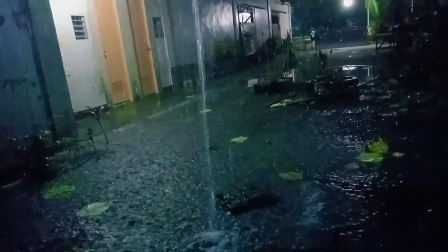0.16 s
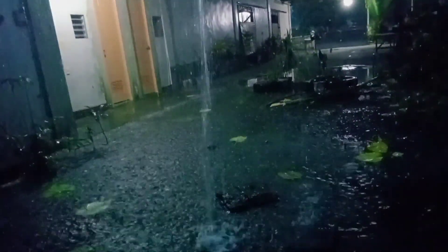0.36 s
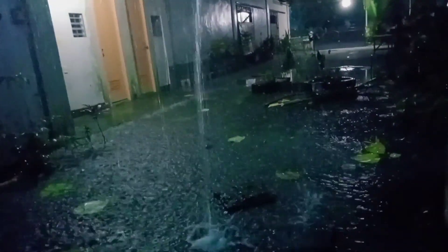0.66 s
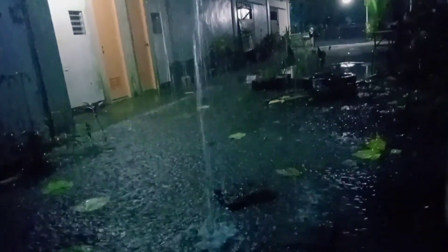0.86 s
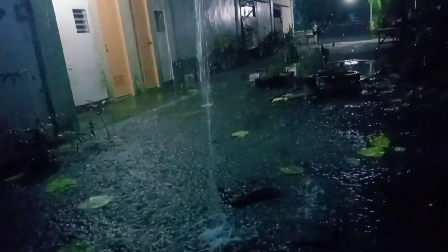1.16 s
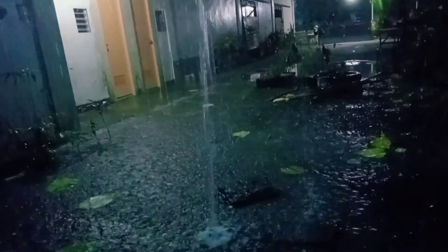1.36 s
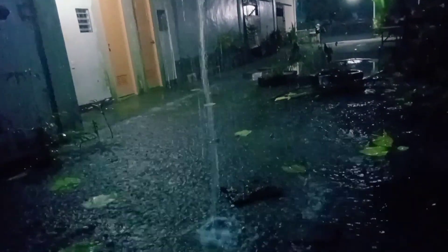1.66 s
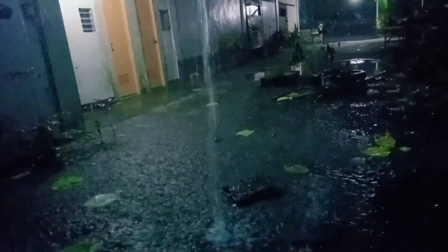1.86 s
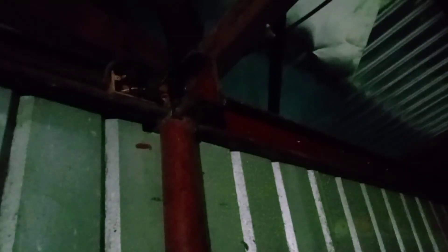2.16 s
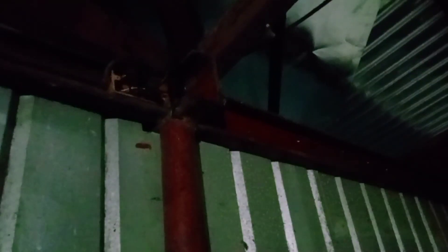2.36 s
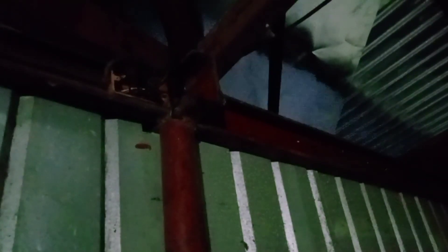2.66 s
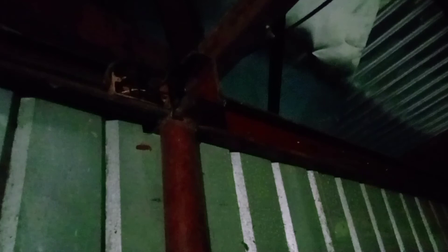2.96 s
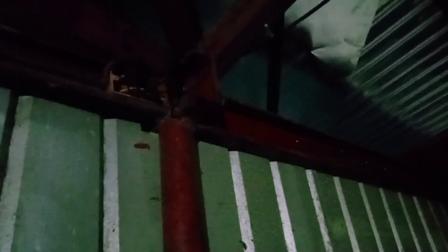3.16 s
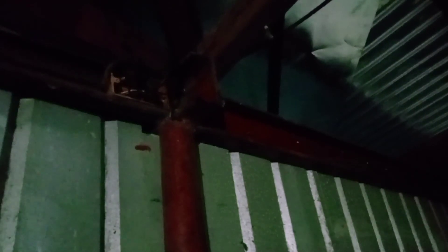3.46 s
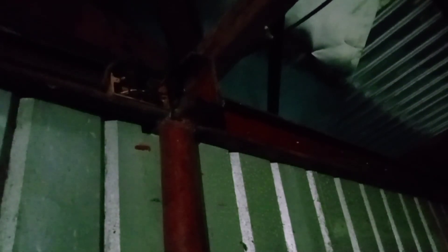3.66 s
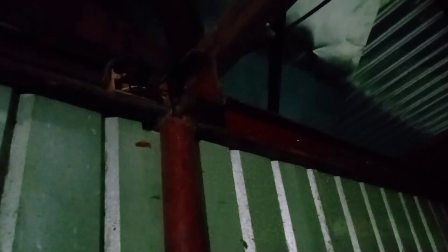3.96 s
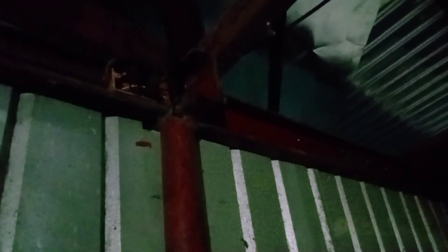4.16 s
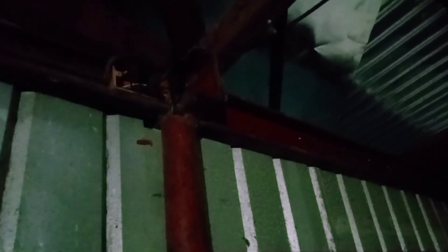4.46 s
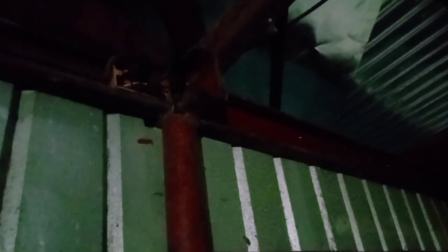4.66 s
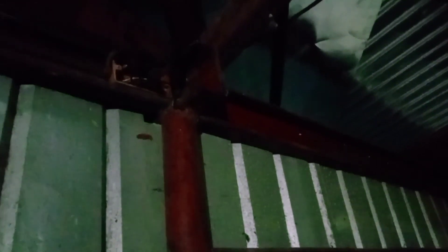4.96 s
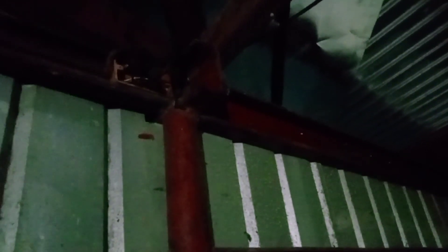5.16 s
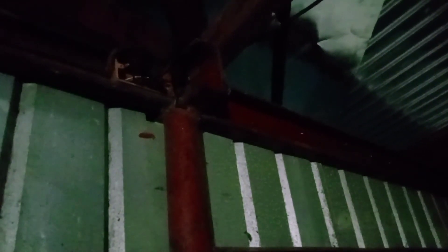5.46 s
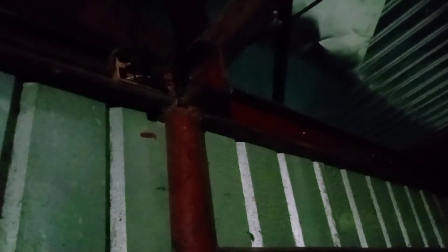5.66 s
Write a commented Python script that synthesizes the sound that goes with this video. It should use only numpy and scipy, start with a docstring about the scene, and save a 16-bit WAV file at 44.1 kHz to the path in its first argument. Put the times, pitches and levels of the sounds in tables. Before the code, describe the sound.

From 0 to about 1.87 seconds, a stream of water falling from eaves breaks on a flooded yard at night: dense sharp slaps, small ringing bubbles, thin fizzing spray and a broad wash of rain, with slight gushes near 0.1, 0.7, 1.25 and 1.6 seconds and a low rumble beneath. A low boom swells just before the sound is cut off. Near-silence lasts until roughly 2.1 seconds, then rain on a corrugated metal roof rises to full within about 0.15 seconds. It is dense and continuous, mixing bright patter with hollow midrange drumming, which bulges around 2.55 seconds. Soft bass booms come at about 2.3 and 3.2 seconds, the latter longest and strongest, with weaker ones at 2.7, 3.6, 3.9 and 4.3. From about 3.3 to 5 seconds the rain eases slightly and its rumble recedes, then holds steady to the end, with one very faint boom near 5.7.

```python
"""A stream off the eaves splashes in a flooded yard; then dense rain drums on a corrugated metal roof.
The stream is random slaps, ringing bubbles and fine spray over a noise wash, gushing now and then.
A near-silence parts the two places. The roof layers bright patter, hollow drumming and a low rumble
from random drops and resonances. Single low modes boom out, and a faint deep rumble lies under both."""
import sys
import numpy as np
from scipy import signal
from scipy.fft import rfft, irfft
from scipy.io import wavfile
from scipy.ndimage import uniform_filter1d

SR = 44100
rng = np.random.default_rng(int(sys.argv[2]) if len(sys.argv) > 2 else 0)


def master(y):
    """Save y as 16-bit WAV."""
    cut = np.clip(np.atleast_2d(y).T, -1, 1)
    pcm = np.round(cut * 32767)  # scale
    wavfile.write(sys.argv[1], SR, pcm.astype(np.int16))


N = 256662

# Tone of the splashing water: pitch_hz [Hz], level_db [dB per Hz, relative]
SPLASH_TONE = [(130, -23.5), (190, -8.5), (230, -2), (280, -7), (450, -5.5), (750, -2.5), (1100, -0.8),
               (1550, 1), (2200, -.5), (2800, -3), (3500, -10), (4300, -17.5), (5500, -23.5), (8000, -44)]


def stream_splash(clumps, wash):
    """Water breaks on water: sharp slaps, ringing bubbles and the wash of far rain; power near 1."""
    slaps = impacts(2800 * clumps, spread_db=1.5, ring_t60=0.025, ring_db=4)
    bubbles = rings(1100 * clumps, spread_db=1.0, cycles=55, low_hz=305.4, high_hz=4970)
    mix = slaps + from_db(-5.5) * bubbles + from_db(2.5) * wash
    water = patchy(mix, depth_db=1.9, rate_hz=8)
    return evened(coloured(water, SPLASH_TONE), span_s=0.089)


# Tone of the lower, fizzing part of the spray: pitch_hz [Hz], level_db [dB per Hz, relative]
FIZZ_TONE = [(4000, -6.5), (5400, -5.5), (6200, 0), (7000, 0), (7450, -8.5), (8400, -16.5), (10000, -30.5)]
# Tone of the finest, highest spray: pitch_hz [Hz], level_db [dB per Hz, relative]
SPRAY_TONE = [(8000, -15), (9200, -7), (9800, -8), (10900, -4.5), (11600, 0.5), (13400, -0.5),
              (14300, -8.5), (15500, -8.5)]
FIZZ_DB, SPRAY_DB = -35, -44.5
FIZZ_FOLLOWS = 0.5   # share of the spray's rise in dB


def thrown_spray(clumps, wash, spray_rise_db):
    """Droplets thrown up by the stream fall back in showers and trap tiny ringing bubbles."""
    droplets = impacts(2400 * clumps, spread_db=3.5, ring_t60=0.035, ring_db=5.5)
    tiny_bubbles = rings(900 * clumps, spread_db=3.0, cycles=290, low_hz=4500, high_hz=13900)
    showers = from_db(0.7 * drift(10)) * (droplets + from_db(-7) * tiny_bubbles)
    mist = showers + from_db(-1.5) * wash
    fizz_gain = from_db(FIZZ_DB + FIZZ_FOLLOWS * spray_rise_db)
    fizz = fizz_gain * evened(coloured(mist, FIZZ_TONE), span_s=0.15)
    spray = from_db(SPRAY_DB + spray_rise_db) * evened(coloured(mist, SPRAY_TONE), span_s=0.15)
    return fizz + spray


# Gushes, mostly louder or richer in spray:
# middle_s [s], length_s [s], splash_rise_db [dB], spray_rise_db [dB]
STREAM_GUSHES = [(0.13, 0.26, 0.6, 2.2), (0.195, 0.07, -0.5, 3), (0.7, 0.22, 1.0, 0.0),
                 (1.25, 0.14, 1.2, 3.2), (1.58, 0.53, 1.0, 0.5)]
# Low modes rumbling in the yard: pitch_hz [Hz], width_hz [Hz], level_db [dB, relative]
YARD_LOW_MODES = [(93, 24, -0.5), (133, 72, -1), (191, 40, -2.5)]
SPLASH_DB, YARD_RUMBLE_DB = -16, -32
STREAM_WAVER_DB = 0.27   # chance wander shared by splash and spray


def yard():
    """The stream arrives in clumps that drive splash and spray together, over a low rumble."""
    splash_rise_db, spray_rise_db = swells(STREAM_GUSHES) + STREAM_WAVER_DB * drift(4)
    clumps = from_db(0.9 * drift(14))
    wash = rng.standard_normal(N)
    splash = from_db(SPLASH_DB + splash_rise_db) * stream_splash(clumps, wash)
    spray = thrown_spray(clumps, wash, spray_rise_db)
    low = from_db(YARD_RUMBLE_DB) * rumble(YARD_LOW_MODES, even_s=0.08)
    return splash + spray + low


# Tone of the bright patter: pitch_hz [Hz], level_db [dB per Hz, relative]
PATTER_TONE = [(600, -9.5), (1150, -1.5), (2200, -1), (3200, -4), (4500, -5.5), (5200, -12.5),
               (6000, -21.5), (6700, -24), (7800, -37), (9600, -41), (10400, -34.5), (11500, -29.5),
               (12600, -38), (15500, -46)]
# Tone of the hollow drumming: pitch_hz [Hz], level_db [dB per Hz, relative]
DRUMMING_TONE = [(120, -25), (190, -6.5), (260, -1.2), (380, -.5), (520, -1.5), (720, 0), (950, -2.5),
                 (1300, -12), (2200, -19)]
# Levels at 0 dB rain; each FOLLOWS is dB gained per dB of rain
PATTER_DB, RAIN_WAVER_DB = -15.5, 0.32
DRUMMING_DB, DRUMMING_FOLLOWS, DRUMMING_WAVER_DB = -18.6, 1.07, 0.96


def struck_sheets(flurries, rain_db):
    """The same drops give the sheets bright patter and hollow drumming; far sheets blur to a wash."""
    patter_db = PATTER_DB + rain_db + RAIN_WAVER_DB * drift(4)
    drumming_db = DRUMMING_DB + DRUMMING_FOLLOWS * rain_db + DRUMMING_WAVER_DB * drift(4.9)
    ticks = impacts(3600 * flurries, spread_db=3.0, ring_t60=0.069, ring_db=4.5)
    # fat drops leave a brief note in the sheet they hit
    knocks = rings(700 * flurries, spread_db=2.0, cycles=47, low_hz=201.1, high_hz=3194)
    mix = ticks + from_db(-10.5) * knocks + from_db(-1.5) * rng.standard_normal(N)
    sheets = patchy(mix, depth_db=1.77, rate_hz=8.5)
    patter = from_db(patter_db) * evened(coloured(sheets, PATTER_TONE), span_s=0.1)
    drumming = from_db(drumming_db) * evened(coloured(sheets, DRUMMING_TONE), span_s=0.17)
    # turned a quarter cycle, the drumming adds to the patter by power where their tones overlap
    return patter + signal.hilbert(drumming).imag


# A squall drives the hollow resonance harder for a moment:
# middle_s [s], length_s [s], rise_db [dB]
HOLLOW_SQUALLS = [(2.55, 0.5, 8.5)]
HOLLOW_HZ, HOLLOW_WIDTH_HZ = 736, 280   # width of each of two passes
HOLLOW_DB, HOLLOW_FOLLOWS = -31, 2.2


def hollow_sheets(flurries, rain_db):
    """Drops excite the sheets' hollow middle resonance, two band-passes in a row."""
    level_db = HOLLOW_DB + HOLLOW_FOLLOWS * rain_db + swells(HOLLOW_SQUALLS)[0]
    hollow = impacts(1300 * flurries, spread_db=2.0, ring_t60=0.067, ring_db=6, count=12)
    for _ in range(2):
        hollow = resonance(hollow, HOLLOW_HZ, HOLLOW_WIDTH_HZ)
    return from_db(level_db) * evened(hollow, span_s=0.15)


# Strength of the rain on the roof, peaking and then easing: time_s [s], level_db [dB]
RAIN_STRENGTH = [(2.24, 0), (3.3, 0.03), (4.1, -0.6), (5.0, -1.4), (5.82, -1.5)]
# Low modes of the roof sheets: pitch_hz [Hz], width_hz [Hz], level_db [dB, relative]
ROOF_LOW_MODES = [(83.7, 31, -0.5), (121.7, 21, 2.5), (142, 24, -1.5), (185.5, 52, -1.5)]
# heavy drops shake the low modes most
ROOF_RUMBLE_DB, ROOF_RUMBLE_FOLLOWS = -28, 4.0


def roof():
    """Flurries of drops strike the sheets, ring their hollow middle and shake their low modes."""
    rain_db, = in_time(RAIN_STRENGTH)
    flurries = from_db(0.7 * drift(10))
    rumble_db = ROOF_RUMBLE_DB + ROOF_RUMBLE_FOLLOWS * rain_db
    low = from_db(rumble_db) * rumble(ROOF_LOW_MODES, even_s=0.079)
    return struck_sheets(flurries, rain_db) + hollow_sheets(flurries, rain_db) + low


# Single low modes that boom out of the rumble:
# middle_s [s], length_s [s], pitch_hz [Hz], level_db [dB rms at the crest, before the shudder]
LOW_BOOMS = [(1.819, 0.12, 138, -23), (2.287, 0.12, 123.8, -21.5), (2.69, 0.09, 120, -28),
             (3.225, 0.27, 119, -20), (3.59, .11, 118, -27.5), (3.88, 0.11, 119, -27),
             (4.342, 0.065, 158, -26), (5.72, 0.12, 130.5, -33)]


def booms():
    """Single low modes boom out, each swelling and dying away, unsteady in pitch and strength."""
    t, out = np.arange(N) / SR, np.zeros(N)
    waver_rad, shudder_db = 0.35 * drift(16), 1.1 * drift(20)
    for middle_s, length_s, hz, db in LOW_BOOMS:
        swell = np.cos(np.pi * np.clip((t - middle_s) / length_s, -0.5, 0.5))
        tone = np.sqrt(2) * np.sin(2 * np.pi * hz * t + waver_rad)
        out += from_db(db) * swell * tone
    return out * from_db(shudder_db)


RUMBLE_WAVER_DB = 1.65


def rumble(modes, even_s):
    """Countless drops, as noise, keep low modes going; their strength swells by chance."""
    shaking = sum(from_db(db) * resonance(rng.standard_normal(N), hz, width)
                  for hz, width, db in modes)
    band = signal.butter(2, [64, 220], "band", fs=SR, output="sos")
    low_modes = signal.sosfilt(band, shaking)
    return from_db(RUMBLE_WAVER_DB * drift(4)) * evened(low_modes, even_s)


# Tone of the downpour's deep rumble: pitch_hz [Hz], level_db [dB per Hz, relative]
DEEP_TONE = [(20, -5), (35, -1), (55, 0)]


def deep_rumble():
    """The faint deep rumble of the downpour: steady noise shaped to the lowest bass."""
    return from_db(-56) * coloured(rng.standard_normal(N), DEEP_TONE)


def impacts(per_s, spread_db, ring_t60, ring_db, count=24):
    """Drops land on many patches; each gives a sharp tick and a ring of its own."""
    out = np.zeros(N)
    for _ in range(count):
        clicks = drops(per_s / count, spread_db)
        ringing = signal.oaconvolve(clicks, dying_noise(ring_t60))[:N]
        out += clicks + from_db(ring_db) * ringing
    return rms_one(out)


def rings(per_s, spread_db, cycles, low_hz, high_hz, count=56):
    """Each impact sets one of many pitches ringing, falling 60 dB in a set number of cycles."""
    out = np.zeros(N)
    for hz in np.geomspace(low_hz, high_hz, count):
        width_hz = np.log(1000) / np.pi * hz / cycles
        ringing = resonance(drops(per_s / count, spread_db), hz, width_hz)
        # weighted so that all pitches together are flat
        out += np.sqrt(hz) * ringing / np.sqrt(width_hz)
    return rms_one(out)


def drops(per_s, spread_db):
    """Random impacts: many small, a few large."""
    at = np.flatnonzero(rng.random(N) < per_s / SR)
    sizes_db = spread_db * np.minimum(rng.exponential(1, len(at)), 3.3)
    clicks = np.zeros(N)
    clicks[at] = from_db(sizes_db) * rng.choice([-1, 1], len(at))
    return clicks


def dying_noise(t60):
    """A crowd of close modes dying together, 60 dB in t60 seconds; energy 1."""
    t = np.arange(int(t60 * SR) + 2) / SR
    tail = rng.standard_normal(len(t)) * from_db(-60 * t / t60)
    return tail / np.sqrt(np.sum(tail ** 2))


def patchy(x, depth_db, rate_hz, count=20):
    """The shower wanders over surfaces of different pitch: each third of an octave swells alone."""
    spectrum = rfft(x)
    hz = np.maximum(np.fft.rfftfreq(N, 1 / SR), 1)
    place = np.clip(3 * np.log2(hz / 180), 0, count - 1)
    out = np.zeros(N)
    for k in range(count):
        # overlapping triangular bands; the higher ones swell less
        band = irfft(spectrum * np.maximum(1 - np.abs(place - k), 0), N)
        out += band * from_db(depth_db * drift(rate_hz) / (1 + k / count))
    return out


def resonance(x, hz, width_hz):
    """Two-pole band-pass with gain 1 on top."""
    r = np.exp(-np.pi * width_hz / SR)
    zeros = np.array([1, 0, -1]) * (1 - r * r) / 2
    poles = [1, -2 * r * np.cos(2 * np.pi * hz / SR), r * r]
    return signal.lfilter(zeros, poles, x + 1e-18)


def coloured(x, spectrum):
    """Give a flat sound a spectrum, with skirts of 30 dB per octave outside it; rms 1."""
    hz, db = np.transpose(spectrum)
    octave = np.log2(np.maximum(np.fft.rfftfreq(N, 1 / SR), 1))
    points = np.log2(hz)
    outside = np.abs(octave - np.clip(octave, points[0], points[-1]))
    gain = from_db(np.interp(octave, points, db) - 30 * outside)
    return rms_one(irfft(rfft(x) * gain, N))


def evened(x, span_s):
    """Hold the power near 1 over spans of this length, keeping the faster flutter."""
    size = max(int(span_s * SR), 2)
    power = uniform_filter1d(uniform_filter1d(x ** 2, size), size)
    return x / np.sqrt(power + 1e-12)


def drift(rate_hz):
    """Slow chance with a spread of 1: noise through two equal low-pass poles at this rate."""
    # worked out at every 40th sample, dropping the filter's start
    r = np.exp(-80 * np.pi * rate_hz / SR)
    noise = rng.standard_normal(N // 40 + 2002)
    slow = signal.lfilter([1], [1, -2 * r, r * r], noise)[2000:]
    return np.interp(np.arange(N) / 40, np.arange(len(slow)), rms_one(slow))


def swells(rows):
    """Rounded rises that come and go: one dB curve for each column after middle and length."""
    t, curves = np.arange(N) / SR, 0
    for middle_s, length_s, *rises_db in rows:
        bump = np.cos(np.pi * np.clip((t - middle_s) / length_s, -0.5, 0.5))
        curves = curves + np.outer(rises_db, bump)
    return curves


def in_time(rows):
    """Each column of a curve at every sample."""
    s, *columns = np.transpose(rows)
    return [np.interp(np.arange(N) / SR, s, c) for c in columns]


def from_db(db):
    """Decibels to gain."""
    return 10 ** (np.asarray(db) / 20)


def rms_one(x):
    """Scale to unit power."""
    return x / np.sqrt(np.mean(x ** 2) + 1e-20)


# the yard is cut off, leaving a faint dying trace
CUT_S, CUT_LENGTH_S = 1.87, 0.0065
TRACE_DB, TRACE_FALL_DB_PER_S, SILENCE_DB = -53, 450, -79.5
# the roof comes in quietly and rises to full level
ENTRY_S, ENTRY_LENGTH_S, ENTRY_DB, RISE_DB_PER_S = 2.077, 0.017, -30.5, 205


def fade():
    """Gain over time: the yard stops short, and after a near-silence the roof fades in."""
    t = np.arange(N) / SR
    trace = from_db(TRACE_DB - TRACE_FALL_DB_PER_S * np.maximum(t - CUT_S, 0))
    leaving = np.clip(1 - (t - CUT_S) / CUT_LENGTH_S, 0, 1) ** 2
    rise = from_db(np.minimum(ENTRY_DB + RISE_DB_PER_S * (t - ENTRY_S), 0))
    entering = np.clip((t - ENTRY_S) / ENTRY_LENGTH_S, 0, 1) * rise
    return leaving + trace + from_db(SILENCE_DB) + entering


def scene():
    """The yard, a moment of near-silence, then the roof."""
    in_yard = np.arange(N) / SR < 2.0   # the place switches inside the near-silence
    place = np.where(in_yard, yard(), roof())
    return ((place + booms() + deep_rumble()) * fade())[None]


def record(dry):
    """The highest peaks are rounded and the top is cut above 15.5 kHz."""
    rounded = dry / (1 + (dry / 0.95) ** 6) ** (1 / 6)
    top_cut = signal.ellip(14, 0.1, 90, 15500, fs=SR, output="sos")
    return signal.sosfilt(top_cut, rounded)


dry = scene()
out = record(dry)
master(out)
```